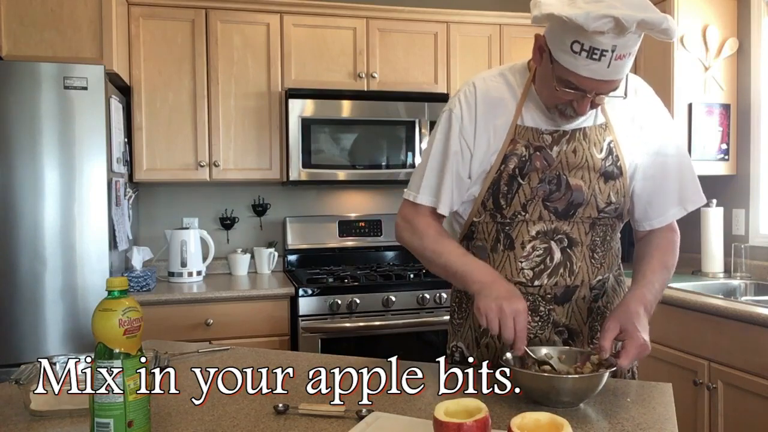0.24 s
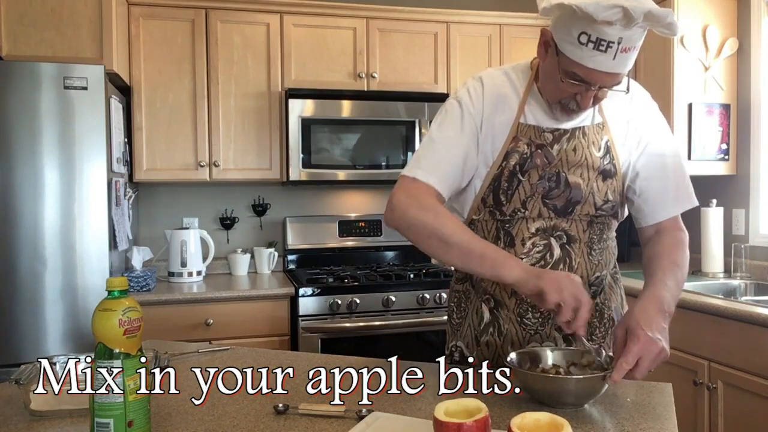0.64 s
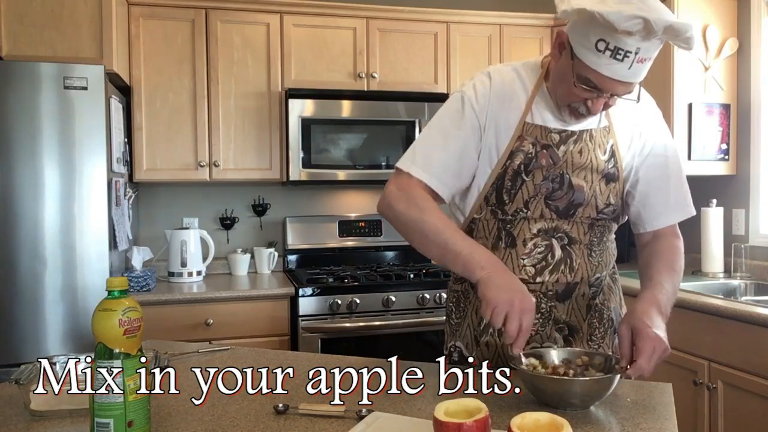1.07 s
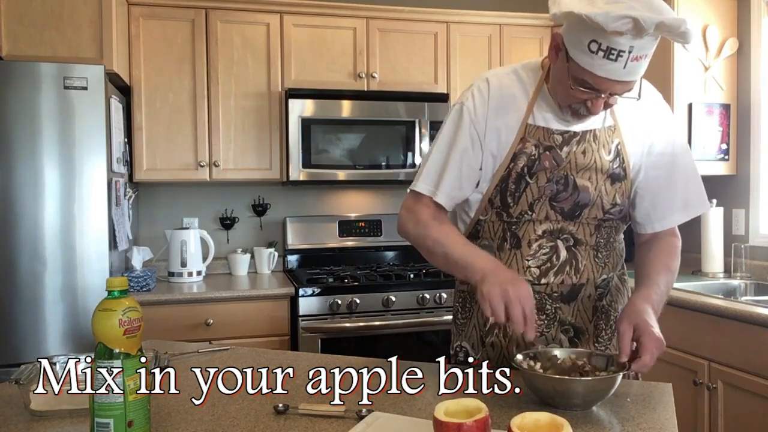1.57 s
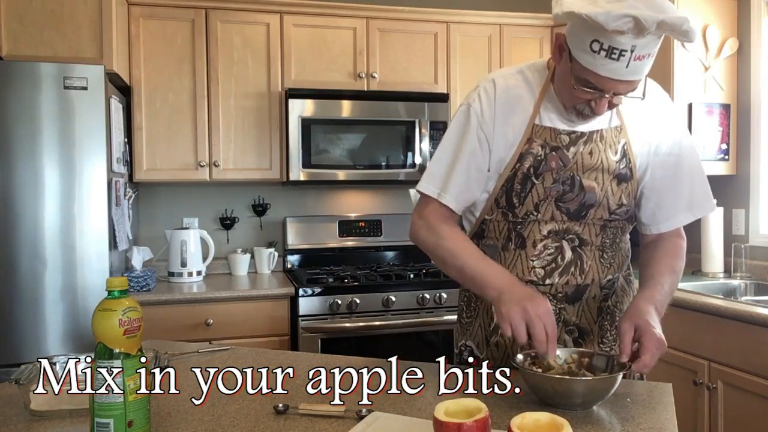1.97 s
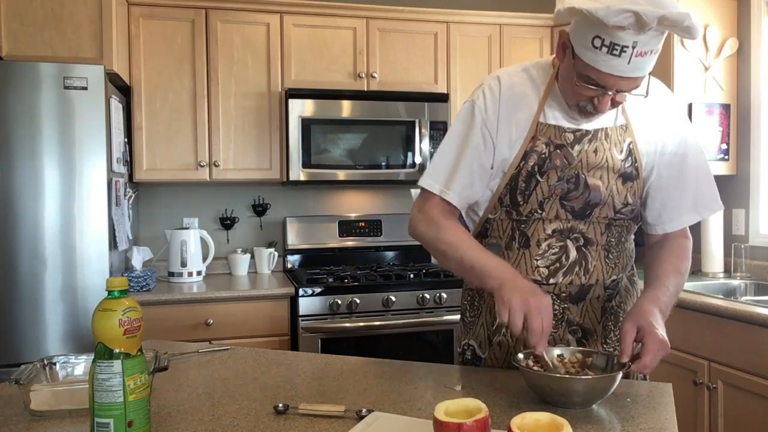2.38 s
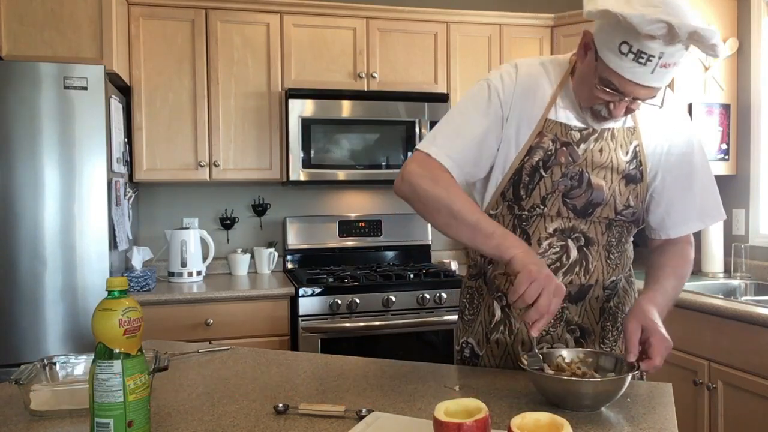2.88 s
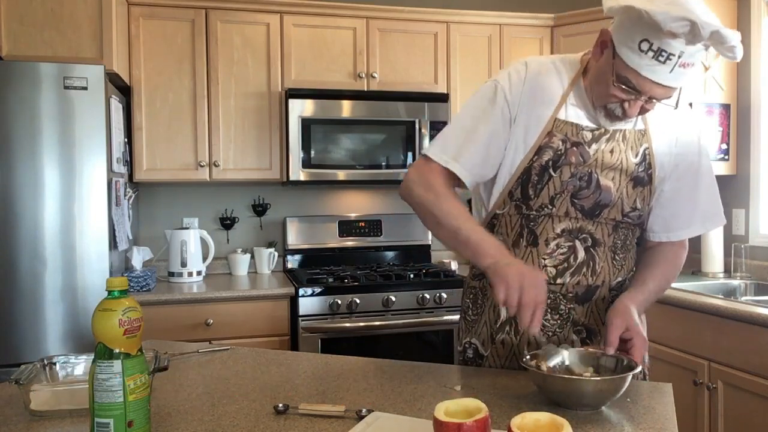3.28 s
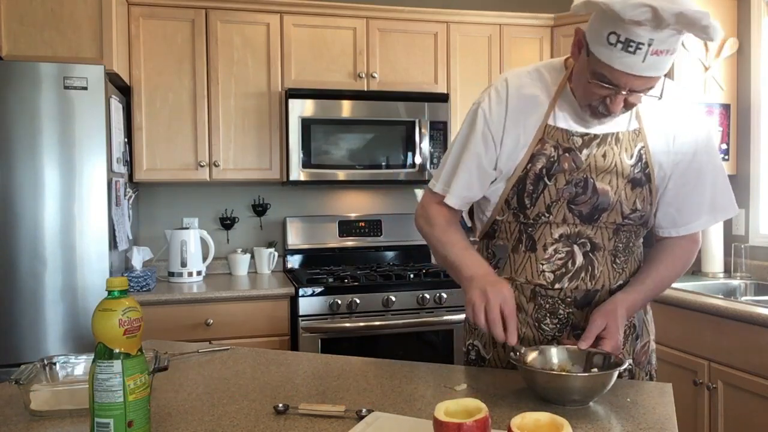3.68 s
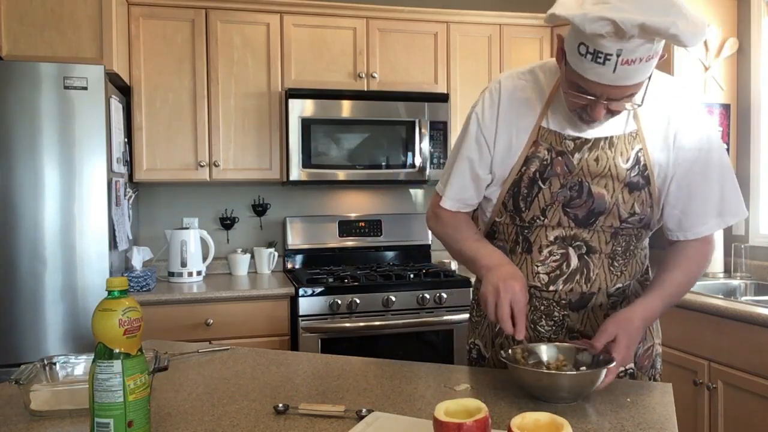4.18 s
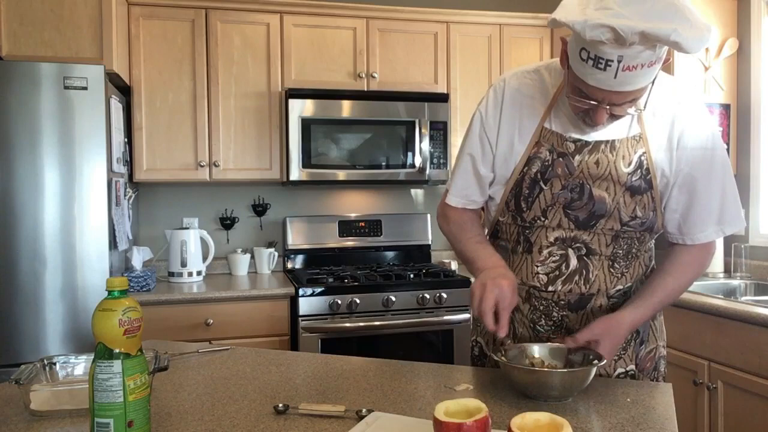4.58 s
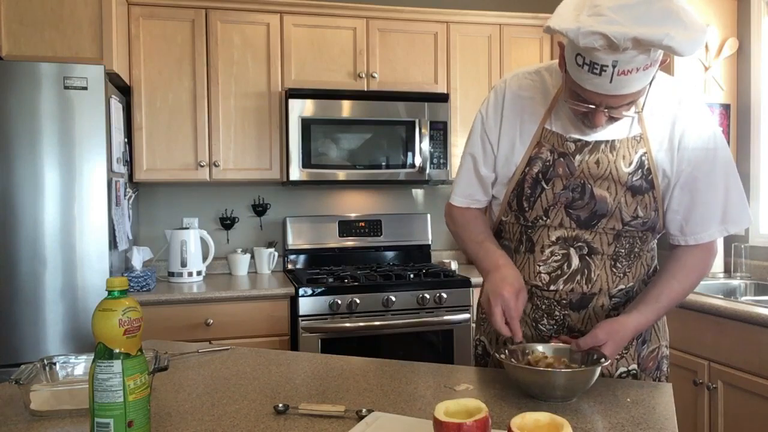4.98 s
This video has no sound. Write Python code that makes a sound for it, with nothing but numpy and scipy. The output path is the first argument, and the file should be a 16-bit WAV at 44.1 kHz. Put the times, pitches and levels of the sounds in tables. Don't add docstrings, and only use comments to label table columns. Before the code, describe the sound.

A metal spoon stirs a chunky, thick mixture in a steel bowl on a stone counter. Short gritty scrapes mix with ticks and muffled knocks; one heavy thud lands just after one second, lighter taps follow, then two hard ringing clinks past four seconds and another near the end. A small camera microphone picks up the lively kitchen over quiet appliance hum.

```python
import sys
import numpy as np
from scipy import signal
from scipy.fft import rfft, irfft
from scipy.io import wavfile
from scipy.ndimage import uniform_filter1d

SR = 44100
rng = np.random.default_rng(int(sys.argv[2]) if len(sys.argv) > 2 else 0)


def output_pcm(signal):
    pcm = np.clip(np.atleast_2d(signal).T, -1, 1) * 32767
    wavfile.write(sys.argv[1], SR, np.round(pcm).astype(np.int16))


def volts(x):
    e = np.asarray(x, float) / 20
    return 10 ** e


N = 230991

# (frequency [Hz], density [dB/Hz])
HUM_SPECTRUM = [(12, -36), (22, -5.5), (65, -2), (206, 1.5), (281, -6), (729, -9.5), (913, -8), (1840, -18),
                (2310, -20), (5070, -25), (9410, -27.5), (15700, -39), (16100, -70)]
HUM_DB = -60

# (start [s], hold [s], hiss [dB], rasp re hiss [dB], rumble re hiss [dB])
STROKES = [(.0, 0.028, -58, -4, 3), (0.055, 0.054, -57, 1.5, 11.5), (0.295, 0.24, -61, -0.5, 5.5),
           (0.575, 0.15, -73, 4, 17.5), (0.764, 0.055, -58, -10, 3), (0.88, 0.043, -54.5, -8, -10),
           (0.986, 0.16, -53.5, -4.5, 4.5), (1.196, 0.13, -61.5, -2, 16), (1.398, 0.078, -67.5, -11, -1),
           (1.542, 0.079, -56, -0.8, 3.5), (1.869, 0.068, -54, 1, 2), (2.15, 0.028, -56, -2, -4.5),
           (2.428, 0.033, -55.5, -1, 4), (2.703, 0.029, -55, -30, 8.5), (2.759, 0.069, -55, -3, 10),
           (3.003, 0.041, -53.5, -3, 7.5), (3.376, 0.017, -64.5, -2.5, -3), (3.49, 0.06, -60, -0.5, 13),
           (3.836, 0.018, -50, 0.5, 3), (3.932, 0.032, -63, -0.5, 15), (4.153, 0.094, -58, 2, 14.5),
           (4.514, 0.072, -59.5, -1.5, 19.5), (4.76, 0.034, -46, -2.5, 6.5), (5.006, 0.11, -65.5, -6, 16.5)]
PRESS_DB_PER_S, LIFT_DB_PER_S = 420, 213
SETTLE_DB_PER_S = 131
# (frequency [Hz], density [dB/Hz])
HISS_SPECTRUM = [(2350, -125), (4000, -36), (6310, 4.5), (9120, 8.5), (10300, 2), (13100, 2.5), (15700, -9),
                 (16100, -45), (16500, -70)]
# (start [s], hold [s], level [dB])
HANDLE_SINGS = [(.07, 0.033, -62), (.38, 0.04, -73), (.58, 0.025, -67), (.87, 0.025, -66),
                (1.13, 0.11, -68), (1.32, 0.095, -67.5), (1.59, 0.015, -59), (1.86, 0.022, -73),
                (2.49, .01, -72), (2.72, 0.1, -56.5), (2.925, 0.01, -58), (3., 0.04, -56),
                (3.365, 0.03, -63), (3.5, 0.05, -59), (3.83, 0.095, -58), (4.04, .02, -81),
                (4.78, 0.12, -66), (5.06, 0.017, -74)]
HANDLE_HZ, HANDLE_WIDTH_HZ = 2378, 55

# (width [Hz], level [dB])
HOLLOW_HZ = [900, 1130, 1480]
HOLLOW_MODES = [(150, 15), (260, 9), (300, 9)]
# (width [Hz], level [dB])
COUNTER_HZ = [85, 150, 272, 320, 400, 510, 590]
COUNTER_MODES = [(13.1, -17.5), (23.2, -5), (43.2, -5), (38.6, 0), (36.5, -1.5), (48.3, 0.5), (62.6, 1)]

# (width [octaves], level [dB], T60 [s])
BOOM_AT = [(.07, 265), (.34, 82), (.36, 1480), (1.115, 1150), (1.116, 444), (1.131, 84), (1.888, 145),
           (2.17, 150), (2.44, 1510), (2.44, 330), (2.97, 140), (3.669, 297), (3.69, 82), (3.83, 510),
           (4.1, 432), (4.1, 956), (4.14, 65), (4.425, 402), (4.426, 280), (4.77, 82), (4.776, 149),
           (4.963, 1200), (4.97, 320), (5., 82)]
BOOMS = [(0.23, -53.5, 0.54), (0.24, -52.5, 0.55), (1.2, -52, 1), (0.17, -31, 0.07), (1.7, -37.5, 0.63),
         (0.2, -45, 0.38), (0.47, -44, 0.19), (0.36, -48.5, 0.27), (0.87, -46, 0.51), (1.47, -46, 0.57),
         (0.37, -44, 0.17), (1.5, -45, 0.22), (0.37, -56, 0.37), (.46, -43, 0.16), (0.84, -33.5, 0.34),
         (0.4, -35, 0.19), (0.4, -52, 0.88), (0.71, -35.5, 0.58), (0.22, -39.5, 0.43), (0.31, -52, 0.53),
         (0.47, -44, 0.38), (0.68, -43.5, 0.23), (0.91, -49.5, 0.83), (0.42, -51.5, 0.53)]
# (time [s], centre [Hz], width [octaves], level [dB], T60 [s])
WALL_SHIMMER = [(0.359, 5400, 0.66, -62, 0.22), (.831, 8750, 1.1, -52, 0.25),
                (0.83, 2630, 0.26, -54.5, 0.16), (1.008, 8700, 0.074, -38.5, 0.2),
                (2.173, 4900, 1.6, -49.5, 0.35), (2.181, 3000, 0.78, -54.5, 0.64),
                (2.438, 5000, 0.98, -52.5, 0.67), (2.692, 9300, 0.56, -54, 1),
                (2.7, 6090, 0.038, -56, 0.72), (3.247, 9220, 0.095, -53, 0.35),
                (3.803, 7440, 1.5, -49, 0.37), (4.099, 8760, 0.31, -41, 0.42), (4.1, 2980, 1.6, -37, 0.29),
                (4.424, 7000, 1.4, -41.5, 0.32), (4.709, 8200, 0.61, -40, 0.24),
                (4.797, 4770, 0.15, -48, 0.13), (4.809, 7900, 0.69, -41, 0.04)]
# (time [s], level [dB])
EDGE_SIZZLE = [
    (2.692, -54),
    (4.1, -41),
    (4.426, -47),
    (4.71, -40.5),
]
SIZZLE_HZ, SIZZLE_OCTAVES, SIZZLE_T60_S = 12500, 0.35, 0.094
BANDED_DB, BANDED_T60_S = -7.5, 0.098

# (time [s], knock peak [dB], clack re knock [dB], tick re knock [dB], tick centre [Hz])
STRIKES = [(0.288, -59, -24, 0, 5290), (.36, -35.5, 0.5, -3, 5160), (0.485, -63, -8, 5, 5600),
           (.785, -52, 5, -8, 8700), (.83, -41, 4, 1, 9100), (.912, -35.5, -1, -8, 8860),
           (.988, -38.5, -20, -18, 5800), (1.009, -53, 6, 20, 8900), (1.607, -45, 3.5, 0, 6740),
           (1.888, -34.5, -8, -6, 6200), (2.173, -41, -2, 5.5, 6400), (2.439, -29.5, -0.5, -8.5, 5750),
           (2.692, -37, -6, -4.5, 8900), (2.918, -42.5, -6, -13, 8650), (3.246, -41.5, -3.5, -10, 9250),
           (3.803, -42.5, -2, -0.5, 8900), (3.817, -36.5, 3.5, -9, 8550), (3.86, -37.5, -11, -10, 8450),
           (4.1, -20.5, -6, -12.5, 8530), (4.143, -39, -39, -2, 9740), (4.4254, -19.5, -7.5, -11.5, 8360),
           (4.499, -29.5, -5.5, -30, 8900), (4.709, -24, -6, -19, 6000), (4.813, -30, -16, -7.5, 7700)]
STRIKE_THUMP_DB = -8.5
# (time [s], knock peak [dB], thump re knock [dB],
# clack re knock [dB])
BUMPS = [(.305, -42, -15, -15), (0.318, -38.5, -17, -1.5), (0.75, -52, -18, 3.5), (0.898, -36, -17, -26),
         (1.116, -11.5, -14, -19), (1.314, -42.5, -15, -27), (1.362, -40.5, -20, -24),
         (1.438, -46, -26, -12), (1.527, -41, -50, -22), (1.562, -48, -2.5, -22), (1.826, -45, -9, -12),
         (1.977, -40.5, -8.5, -7), (2.406, -40.5, -7, -27), (2.737, -44, -6, -13), (2.7927, -24, -39, -8),
         (2.963, -33, -15, -12), (3.128, -42, -6.5, -14), (3.233, -40, -31, -10), (3.327, -38.5, -15, -24),
         (3.364, -43.5, -5.5, -7), (3.437, -49, -19, -21), (3.666, -28, -7.5, -9.5),
         (3.83, -39, -17.5, 0.5), (4.015, -39, -6, -10), (4.262, -35.5, -10, -22), (4.357, -37, -10, -7.5),
         (4.739, -36, -9, -19), (4.769, -25.5, -6, -7.5), (4.964, -31, -14.5, -9), (4.987, -34, -13, -7.5),
         (1.154, -35, -8, -19), (1.221, -43, -15, -22), (1.54, -43, -11, -7), (1.59, -41.5, -23, -15),
            (2.901, -54, -17, -9), (3.273, -46, -17, -3.5), (4.116, -28.5, -7, -16), (4.318, -44, -17, -18),
            (4.438, -28, -25, -9), (4.784, -31, -8, -17), (4.971, -36.5, -9, -5), (5.015, -42, -14, -21)]
BUMP_TICK_DB, BUMP_TICK_HZ = -17, 5500
BUMP_CLACK_TOP_HZ, BUMP_RISE_S = 2300, 0.0016
TICK_AIR_DB = -4
COUNTER_ECHO_S, COUNTER_ECHO_DB = 0.001354, -10

# (hold [s], width [octaves], level [dB])
RUB_AT = [(2.13, 2400), (2.185, 3220), (2.2, 2500), (2.15, 4600), (2.45, 1700), (2.455, 1420), (2.46, 2980),
          (2.455, 4000), (2.805, 1570), (2.81, 590), (.835, 6400), (1.035, 4750), (.9, 900), (3.82, 2060),
          (3.805, 7950), (3.85, 900), (4.103, 480), (4.22, 450), (4.43, 5200), (4.72, 4050), (4.78, 5000),
          (2.77, 4680), (4.43, 1650), (1.62, 2000), (1.15, 82), (1.12, 3300), (.84, 2450), (2.12, 4500),
          (4.77, 390), (3.85, 540), (4.11, 4200), (.4, 2200), (.535, 2450)]
RUBS = [(0.044, 0.11, -71), (.06, 0.096, -58), (.04, 0.18, -61), (0.096, .2, -64), (0.055, 0.23, -57),
        (.03, 0.25, -56), (0.063, .15, -59), (0.015, .1, -55), (0.018, .08, -56), (0.057, 0.2, -57.5),
        (0.037, .15, -62), (0.026, 0.054, -61), (.01, 0.43, -50.5), (.12, 0.045, -61), (.08, .06, -59),
        (0.016, 0.24, -61), (0.0092, 0.24, -33.5), (0.012, 0.37, -46), (0.12, 0.64, -60.5),
        (0.09, .05, -60), (.03, 0.12, -68), (0.032, 0.053, -62), (0.061, 0.13, -54), (0.015, 0.37, -58),
        (0.059, 0.22, -50.5), (0.034, .7, -55), (0.092, 0.055, -60.5), (0.057, 0.79, -63),
        (0.067, 0.32, -47), (0.044, 0.29, -54.5), (0.056, 0.5, -53.5), (0.036, .3, -62), (0.057, .2, -64)]
RUB_RISE_DB_PER_S, RUB_FALL_DB_PER_S = 4000, 330

# (time [s]), then (level [dB])
SNAP_AT = [.762, .783, .913, .977, 1.1158, 2.406, 3.755, 3.835, 4.742, 4.813, 4.987]
SNAPS = [-54, -54, -44, -52, -33, -54, -56, -47, -47, -40, -50]

# (time [s], level [dB], tilt [dB/octave], T60 factor [1])
CLINKS = [
    (2.175, -58, 4, 0.16),
    (4.1, -34.5, -1, 0.68),
    (4.425, -47.5, 4, 0.86),
    (4.711, -45.5, 8, 0.67),
    (4.771, -45, -2, 0.38),
]
# (level [dB], T60 [s])
RIM_HZ = [953, 1491, 1707, 2143, 2293, 2875, 2958, 3182, 3418, 3768, 3994, 4172, 4517, 4646, 5868, 8000,
          9744]
RIM_MODES = [(-24, 0.091), (-6.5, 0.31), (1, 0.072), (-8.5, 0.69), (-0.5, 0.34), (-5, 0.38), (-1, 0.26),
             (-29, .2), (-8, 0.13), (-39, 0.1), (-26, 0.35), (-47, 0.12), (-43, .2), (-17, 0.3), (-6, 0.1),
             (-18, 0.14), (-24, .1)]
# (level [dB], T60 [s])
CHIME_AT = [(.88, 9500), (.88, 11300), (.992, 6000), (2.692, 6126), (2.692, 3924), (2.75, 6126),
            (3.802, 8100), (3.802, 3450), (4.445, 5950), (4.725, 2891), (4.72, 1685), (2.46, 1480),
            (4.101, 2143), (3.246, 9150), (3.252, 9600), (1.009, 8100), (1.009, 8950), (1.016, 9250),
            (.83, 9750), (4.102, 3483), (4.712, 3483), (4.712, 2137), (4.77, 953), (2.173, 3095),
            (2.18, 6900), (2.692, 9900), (3.23, 8300), (4.426, 4678), (4.102, 2880), (2.439, 1450),
            (2.439, 2000), (2.174, 2500), (2.174, 820), (2.692, 2550), (2.793, 1050), (4.357, 910),
            (2.44, 6200), (1.1152, 1500), (.913, 2950), (4.261, 960), (4.426, 1150)]
CHIMES = [(-64, .15), (-66, 0.11), (-43, 0.044), (-39, 0.082), (-48, 0.05), (-54, .2), (-40, .06),
          (-41.5, 0.055), (-36, 0.038), (-30, 0.044), (-36, 0.09), (-61, 0.081), (-38, 0.1),
          (-31.5, 0.0078), (-49, .04), (-24.5, 0.013), (-33, 0.012), (-44, 0.026), (-46, 0.018),
          (-33, 0.081), (-62, .09), (-58, .17), (-34, 0.14), (-36.5, 0.029), (-38.5, .03), (-46, 0.022),
          (-53, 0.053), (-51, 0.13), (-39, 0.12), (-27, 0.012), (-50, 0.008), (-34.5, 0.016), (-47, 0.047),
          (-38.5, 0.02), (-30, 0.044), (-46, .04), (-35, 0.023), (-23.5, 0.0062), (-47, 0.038), (-40, .03),
          (-35, 0.026)]

# (hold [s], level [dB])
SING_AT = [(.878, 9500), (.885, 11300), (.838, 6400), (1.006, 6050), (2.748, 6140), (2.715, 6110),
           (2.8, 4650), (4.485, 5700), (4.145, 2880), (4.716, 2891), (4.74, 5900), (4.79, 2891),
           (4.825, 2891), (4.436, 5960), (4.432, 2912), (1.562, 870), (1.603, 2200), (2.8, 953),
           (4.74, 3500), (1.225, 1080)]
SINGS = [(.03, -56.5), (.025, -59), (.003, -52), (.008, -54), (0.033, -52), (0.018, -68), (.02, -70),
         (.008, -59), (0.047, -57), (.012, -57), (0.0093, -51), (0.0066, -53), (0.013, -57), (0.0098, -52),
         (0.018, -48), (0.021, -53.5), (0.0047, -54.5), (0.057, -57), (.008, -59), (0.015, -46.5)]
SING_RISE_DB_PER_S, SING_FALL_DB_PER_S, SING_WAVER_DB = 1500, 900, 4.5

# (hold [s], level [dB])
HELD_AT = [(4.114, 2143), (4.2, 2143), (4.14, 2875), (4.245, 2875), (4.72, 2137), (4.80, 2150),
           (4.79, 3483), (2.752, 6150), (4.112, 1000), (4.354, 915), (4.259, 960), (2.958, 930)]
HELD = [(0.057, -37.5), (.035, -52), (0.065, -51.5), (.02, -69), (.04, -52), (.04, -65), (0.072, -62),
        (0.017, -47), (0.022, -40), (0.0043, -49), (.005, -46), (0.0073, -44)]
HELD_RISE_DB_PER_S, HELD_FALL_DB_PER_S = 2500, 700

# (frequency [Hz], T60 [s])
KITCHEN_T60 = [(100, 0.21), (260, 0.6), (700, 0.33), (1840, 0.65), (4850, 0.55), (12800, 0.34)]
# (delay [s], level [dB])
ECHOES = [
    (.0032, 3),
    (.0061, 3.5),
    (.0105, -6),
    (.0148, -12),
    (.021, -27),
    (.03, -25),
]
ROOM_DB = {"knock": -5, "thump": 1.5, "tick": -4, "ring": -11.5, "drag": -5.5}
# (frequency [Hz], width [Hz]), then (gain [dB])
STANDING_AT = [(84, 18), (110, 30), (148, 24), (200, 45), (268, 40)]
STANDING_DB = [7, -8, 2.5, -7, 3]
EDGE_HZ = 16650


def evened(x):
    return x / np.sqrt(np.mean(x ** 2) + 1e-20)


def peaked(x):
    return x / (abs(x).max() + 1e-20)


def read(points, hz):
    f, value = np.transpose(points)
    return np.interp(np.log(hz + 1), np.log(f + 1), value)


def add(mix, s, sound):
    part = mix[round(s * SR):][:len(sound)]
    part += sound[:len(part)]


def band(x, lo_hz, hi_hz):
    sos = signal.butter(2, [lo_hz, min(hi_hz, SR / 2.2)], "band", fs=SR, output="sos")
    return signal.sosfilt(sos, x)


def octave_band(x, hz, octaves):
    half = 2 ** (octaves / 2)
    return band(x, hz / half, hz * half)


def colour(x, points):
    gain = volts(read(points, np.fft.rfftfreq(len(x), 1 / SR)))
    return evened(irfft(rfft(x) * gain, len(x)))


def softened(x, rise_s):
    t = np.arange(len(x)) / SR
    return x * (1 - np.exp(-(t / rise_s) ** 2))


def swells(rows, rise_db_per_s, fall_db_per_s):
    t = np.arange(0, N + 64, 64) / SR
    level = np.zeros(len(t))
    for s, hold, db in rows:
        early = rise_db_per_s * np.maximum(s - t, 0)
        late = fall_db_per_s * np.maximum(t - s - hold, 0)
        level += volts(db - early - late)
    return np.interp(np.arange(N) / SR, t, level)


def ring(hz, t60, size=2000):
    t = np.arange(size) / SR
    return volts(-60 * t / max(t60, 0.001)) * np.sin(2 * np.pi * hz * t)


def body(centres, modes, spread):
    out = np.zeros(6000)
    for hz, (width_hz, db), shift in zip(centres, modes, spread):
        out += volts(db) * ring(hz * shift, 2.03 / width_hz, size=6000)
    return out


def hum():
    swell_db = evened(uniform_filter1d(rng.standard_normal(N), 5000))
    return volts(HUM_DB + 2.0 + swell_db) * colour(rng.standard_normal(N), HUM_SPECTRUM)


def drag():
    s, hold, db, rasp_db, rumble_db = np.transpose(STROKES)
    judder = volts(3 * evened(uniform_filter1d(rng.standard_normal(N), 250)))
    grit = judder * rng.standard_normal(N) * (rng.random(N) < 5000 / SR)
    lumps = rng.standard_normal(N) * (rng.random(N) < 500 / SR)
    lumps *= volts(1.5 * np.minimum(rng.exponential(1, N), 3))

    hiss_gain = volts(-2.0) * swells(zip(s, hold, db), PRESS_DB_PER_S, LIFT_DB_PER_S)
    hiss = hiss_gain * colour(grit, HISS_SPECTRUM)

    rasp_gain = swells(zip(s, hold, db + rasp_db), PRESS_DB_PER_S, LIFT_DB_PER_S)
    rasp = rasp_gain * evened(band(grit, 1050, 6020))

    hollow = body(HOLLOW_HZ, HOLLOW_MODES, np.ones(3))
    hollow = hollow + volts(-2.5) * body(COUNTER_HZ, COUNTER_MODES, np.ones(7))
    rumble_gain = swells(zip(s, hold, db + rumble_db - 11.5), PRESS_DB_PER_S, SETTLE_DB_PER_S)
    rumble = rumble_gain * evened(signal.oaconvolve(lumps, hollow)[:N])

    mode = ring(HANDLE_HZ, 2.2 / HANDLE_WIDTH_HZ, size=5000)
    drive = (grit * judder ** 2)[::-1]
    handle = evened(signal.oaconvolve(drive, mode)[:N])
    handle = volts(0.5) * swells(HANDLE_SINGS, 370, 320) * handle
    return hiss + rasp + rumble + handle


def shimmers():
    out, t = np.zeros(N), np.arange(20000) / SR
    rim = sum(ring(hz, BANDED_T60_S, size=4000) for hz in RIM_HZ)
    booms = [(*at, *row) for at, row in zip(BOOM_AT, BOOMS)]
    sizzle = [(s, SIZZLE_HZ, SIZZLE_OCTAVES, db, SIZZLE_T60_S) for s, db in EDGE_SIZZLE]
    for s, hz, octaves, db, t60 in WALL_SHIMMER + booms + sizzle:
        white = rng.standard_normal(len(t) + len(rim))
        banded = evened(signal.fftconvolve(white, rim, "valid")[:len(t)])
        noise = octave_band(white[:len(t)] + volts(BANDED_DB) * banded, hz, octaves)
        add(out, s, softened(volts(db - 60 * t / t60) * evened(noise), 0.00034))
    return out


def contacts():
    knocks, thumps, ticks = out = np.zeros((3, N))
    t = np.arange(1500) / SR
    touches = [(s, db, STRIKE_THUMP_DB, *rest, 3370, 0.00064) for s, db, *rest in STRIKES]
    for row in BUMPS:
        touches.append((*row, row[-1] + BUMP_TICK_DB, BUMP_TICK_HZ, BUMP_CLACK_TOP_HZ, BUMP_RISE_S))
    for s, db, thump_db, clack_db, tick_db, hz, top_hz, rise_s in touches:
        place = 1 + 0.04 * rng.uniform(-1, 1, 10)
        clack_noise, tick_noise = rng.standard_normal((2, len(t)))

        damping = volts(0.28 * (db + 64))
        hollow = [(width_hz * damping, mode_db) for width_hz, mode_db in HOLLOW_MODES]
        knock = softened(body(HOLLOW_HZ, hollow, place[:3]), rise_s)
        add(knocks, s, volts(db) * peaked(knock))

        thump = softened(body(COUNTER_HZ, COUNTER_MODES, place[3:]), 0.0014)
        add(thumps, s, volts(db + thump_db - 0.5) * peaked(thump))

        clack = softened(clack_noise, 0.00056) * np.exp(-t / 0.00087)
        clack = band(band(clack, 1010, top_hz), 970, top_hz)
        add(ticks, s, volts(db + clack_db + 1.0) * peaked(clack))

        burst = softened(tick_noise, 0.0004) * np.exp(-t / 0.0008)
        centre = band(band(burst, hz / 1.3, hz * 1.3), hz / 1.3, hz * 1.3)
        tick = peaked(centre) + volts(TICK_AIR_DB) * peaked(band(burst, 5000, 14500))
        add(ticks, s, volts(db + tick_db + 9.0) * peaked(tick))
    late = round(COUNTER_ECHO_S * SR)
    ticks[late:] += volts(COUNTER_ECHO_DB) * ticks[:-late]
    return out


def rubs():
    out, grit = np.zeros(N), rng.standard_normal(N)
    for (s, hz), (hold, octaves, db) in zip(RUB_AT, RUBS):
        at = slice(round((s - 0.1) * SR), round((s + 0.5) * SR))
        note = evened(octave_band(grit[at], hz, octaves))
        out[at] += swells([(s, hold, db)], RUB_RISE_DB_PER_S, RUB_FALL_DB_PER_S)[at] * note
    return out


def snaps():
    out = np.zeros(N)
    click = peaked(band(np.exp(-np.arange(200) / 1.2), 3200, 14000))
    for s, db in zip(SNAP_AT, SNAPS):
        add(out, s, volts(db) * click)
    return out


def rings():
    out = np.zeros(N)
    for s, db, tilt_db, damping in CLINKS:
        spots_db = rng.standard_normal(len(RIM_MODES))
        for hz, (mode_db, t60), spot_db in zip(RIM_HZ, RIM_MODES, spots_db):
            level_db = db + mode_db + spot_db + tilt_db * np.log2(hz / 2000)
            add(out, s, volts(level_db) * ring(hz, t60 * damping, size=16000))
    for (s, hz), (db, t60) in zip(CHIME_AT, CHIMES):
        add(out, s, volts(db) * ring(hz, t60, size=12000))
    return out


def singing():
    out, t = np.zeros(N), np.arange(-900, 6000) / SR
    for (s, hz), (hold, db) in zip(SING_AT, SINGS):
        waver = evened(uniform_filter1d(rng.standard_normal(len(t)), size=300))
        rise_db = SING_RISE_DB_PER_S * np.minimum(t, 0)
        fall_db = SING_FALL_DB_PER_S * np.maximum(t - hold, 0)
        level_db = db + rise_db - fall_db + SING_WAVER_DB * waver
        add(out, s + t[0], volts(level_db) * np.sin(2 * np.pi * hz * t))
    return out


def held():
    out, t = np.zeros(N), np.arange(N) / SR
    for (s, hz), row in zip(HELD_AT, HELD):
        gain = swells([(s, *row)], HELD_RISE_DB_PER_S, HELD_FALL_DB_PER_S)
        out += gain * np.sin(2 * np.pi * hz * t)
    return out


def kitchen():
    taps = np.zeros(SR)
    at = np.arange(200, SR - 12, 12)
    taps[at + rng.integers(0, 12, len(at))] = rng.choice([-1., 1.], len(at))
    hz, t, z = signal.stft(taps, SR, nperseg=512)
    decay = volts(-60 * t / read(KITCHEN_T60, hz)[:, None])
    tail = signal.istft(z * decay, SR, nperseg=512)[1][:SR]
    tail = softened(tail, 0.002)
    tail = tail / np.linalg.norm(tail)
    for k, (s, db) in enumerate(ECHOES):
        tail[round(s * SR)] += (-1) ** k * volts(db - 13.5)
    return tail


def standing(x):
    for (hz, width_hz), db in zip(STANDING_AT, STANDING_DB):
        x = x + (volts(db) - 1) * signal.lfilter(*signal.iirpeak(hz, hz / width_hz, SR), x)
    return x


def scene():
    scrape = drag()
    knocks, thumps, ticks = contacts()
    parts = {"knock": knocks, "thump": thumps, "tick": ticks + snaps(),
             "ring": rings() + singing() + held(), "drag": scrape}
    sent = sum(volts(ROOM_DB[name]) * part for name, part in parts.items())
    reverb = signal.fftconvolve(sent, kitchen())[:N]
    bowl = sum(parts.values()) + shimmers() + reverb
    thin = signal.sosfilt(signal.butter(2, 60, "high", fs=SR, output="sos"), bowl)
    return standing(thin + hum() + rubs())[None]


def band_limit(x):
    return signal.sosfilt(signal.butter(12, 16770, fs=SR, output="sos"), x)


def record(dry):
    lowpass = signal.firwin(401, EDGE_HZ, window=("kaiser", 10), fs=SR)
    limited = signal.oaconvolve(dry, lowpass[None], "same")
    return band_limit(limited)


dry = scene()
out = record(dry)
output_pcm(out)
```